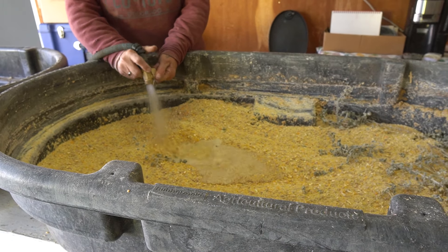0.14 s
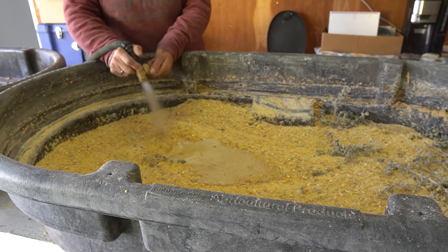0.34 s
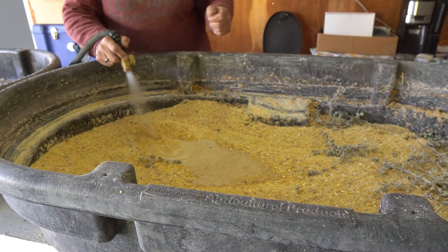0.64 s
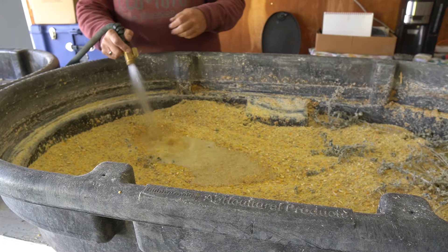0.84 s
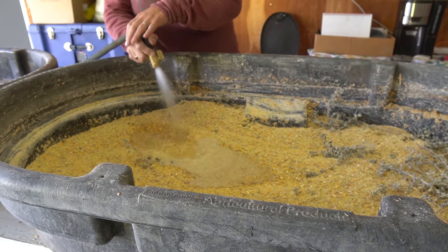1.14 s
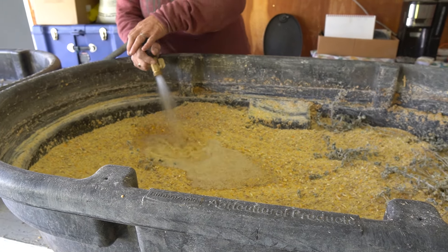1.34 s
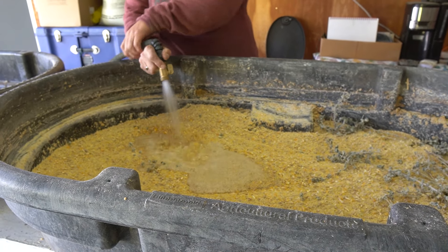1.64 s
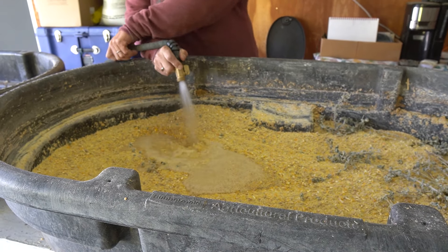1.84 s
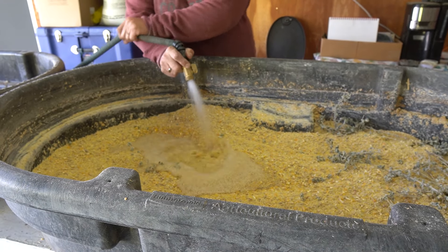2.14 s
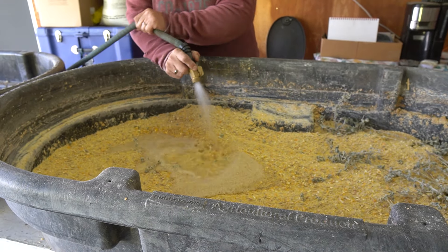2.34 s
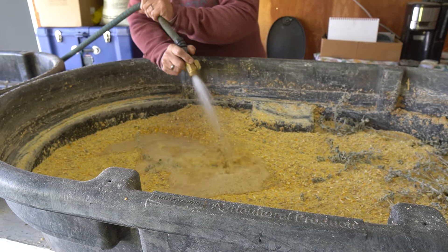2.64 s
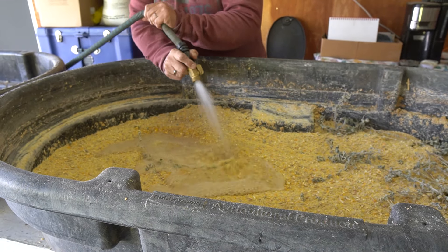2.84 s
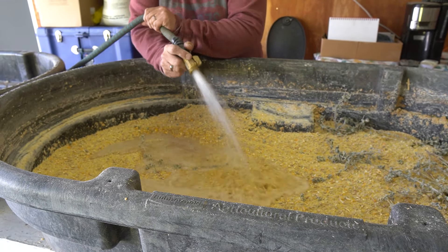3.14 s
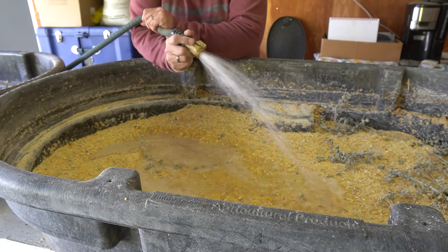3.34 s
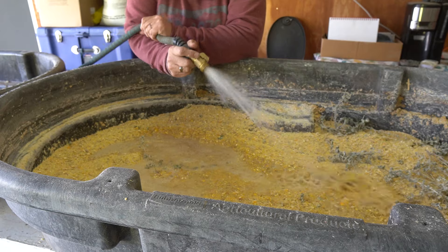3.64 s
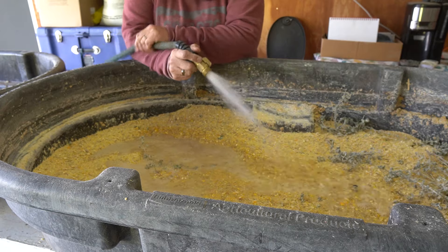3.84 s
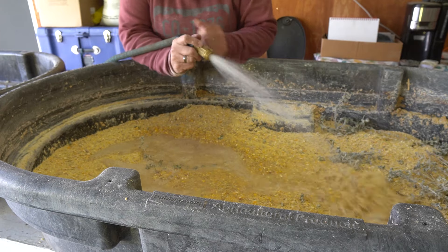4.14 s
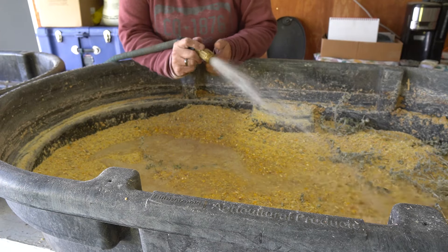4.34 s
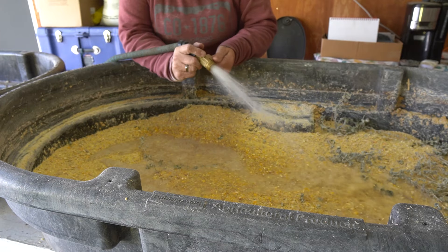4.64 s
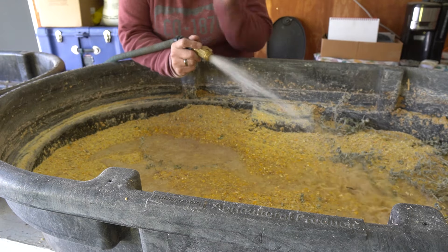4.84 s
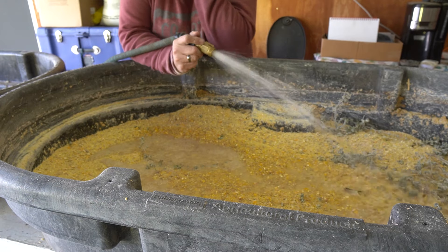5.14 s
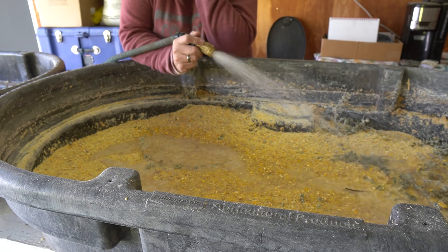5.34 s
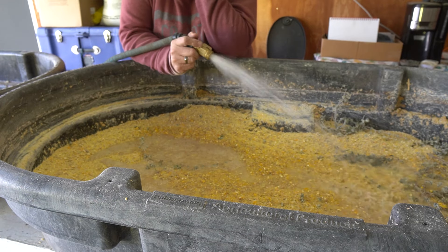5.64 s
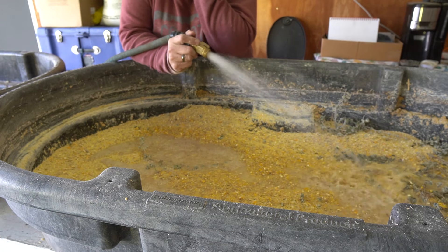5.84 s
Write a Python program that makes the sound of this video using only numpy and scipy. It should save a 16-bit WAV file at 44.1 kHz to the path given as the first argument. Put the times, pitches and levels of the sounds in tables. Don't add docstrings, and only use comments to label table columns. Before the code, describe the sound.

A hose nozzle sprays water steadily onto wet grain and puddles in a plastic tub, very close. A bright, grainy hiss spits violently just before one second, calms, gushes briefly around two and a half, then spits again after four. Dull tank drumming lies beneath. The right side is nearer and sharper; the left is quieter and duller.

```python
import sys
import numpy as np
from scipy import signal
from scipy.fft import rfft, irfft, next_fast_len
from scipy.io import wavfile
from scipy.ndimage import uniform_filter1d

SR = 44100
rng = np.random.default_rng(int(sys.argv[2]) if len(sys.argv) > 2 else 0)


def attenuation_scalar(level_db):
    decades = np.asarray(level_db, float) / 20
    return 10 ** decades


def int16_out(signal):
    q = np.round(np.clip(np.atleast_2d(signal).T, -1, 1) * 32767)
    wavfile.write(sys.argv[1], SR, q.astype(np.int16))


N = 263277

# time in seconds, force in dB, fine mist in dB against it, puddle splash in dB against it.
JET = [(0.0, -41, -9.5, -11.5), (0.32, -44.5, -6, -9.5), (0.66, -39, -7, -15), (0.83, -29, -13.5, -9.5),
       (1.05, -39.5, -7, -11), (1.13, -42, -4.5, -9), (1.68, -43, -8, -9), (1.76, -47, -3.5, -5),
       (2.43, -45.5, -2, -9.5), (2.58, -41, -7.5, -12.5), (2.96, -44.5, -3, -5), (3.44, -41, -3, -15.5),
       (4.22, -40.5, -3, -12.5), (4.64, -33.5, -7.5, -9.5), (4.74, -37.5, -4, -12.5), (5.12, -42, -9, -7),
       (5.94, -41.5, -9, -11.5), (5.97, -40, -11, -13)]
# time in seconds, left-right of drops in dB, left-right of mist in dB.
AIM = [(0.0, -12, -7.0), (0.23, -6, -6), (1.01, -14, -9.5), (1.11, -3.5, -4), (1.3, -2, -7),
       (1.83, 1.5, 5.5), (2.18, -3.5, 0), (2.98, -5.5, -3.0), (3.52, -12, -11.0), (4.16, -10.5, -9.5),
       (4.42, -14.0, -11.0), (4.85, -11.0, -10.5), (5.07, -13.5, 3), (5.97, -10.5, 1.5)]
# time in seconds, delay in ms.
TANK_LAG = [(0, 2.65), (.7, 2.58), (2.5, 2.2), (2.8, 1.4), (3.4, 0.97), (4.1, 0.99), (4.6, 0.52),
            (5.97, 0.16)]
# time in seconds, port resonance in Hz, its lift in dB,
# surface echo dip in Hz, its depth in dB.
ANGLE = [(0, 4520, 5, 2100, -3), (.6, 4540, 8, 2630, 8), (1.2, 4540, 0.5, 2670, 3),
         (1.7, 4350, 8, 2370, 5.5), (2.2, 4400, 3, 2460, 5), (2.6, 4200, 5.5, 2020, 4.5),
         (3.1, 4280, 6.5, 1940, 9.5), (3.5, 4470, 10.5, 2050, 3), (4.1, 4280, 7.5, 2130, 3),
         (4.6, 4340, 6, 2260, -1), (5.2, 4160, 5, 2240, 15.5), (5.97, 3850, 3, 2180, 8.5)]
# time in seconds, share from 0 to 1.
POOL = [(0, 0.45), (1.3, 0.35), (1.55, 1), (2.0, 0.4), (2.6, 1), (2.75, .3), (3.6, 0.45), (4.2, 0.16),
        (5.97, 0.4)]
# peak in seconds, lift in dB, rise in seconds, fall in seconds.
GUSHES = [(0.0, 1, .01, .01), (0.765, 2, 0.005, 0.027), (0.83, 3.5, 0.034, 0.015), (0.992, 6, .012, 0.0064),
          (1.035, 5.5, 0.011, 0.024), (1.16, -0.5, 0.017, 0.071), (1.43, 5.5, 0.01, .05),
          (1.61, 0, .02, .02), (2.06, 1, 0.044, 0.018), (2.31, 1, 0.049, 0.11), (2.59, 8, 0.048, 0.037),
          (2.68, 9.5, 0.0086, 0.0038), (2.93, 0, 0.02, 0.045), (4.27, 2, 0.026, 0.059),
          (4.17, -4, .04, 0.015), (1.012, -6, .006, .008), (1.29, 3.5, 0.014, .02),
          (4.615, 2.5, 0.025, 0.033), (5.9, 0, 0.064, 0.036)]
# peak in seconds, lift in dB, rise in seconds, fall in seconds.
SWINGS = [
    (1.9, -3, .08, 0.044),
    (2.23, 2, 0.07, .08),
    (2.42, -1.5, .05, 0.056),
    (3.2, 2, .08, 0.13),
    (3.52, -2, 0.059, 0.093),
    (4.5, 1.5, .03, .05),
]
# time in seconds, peak at the near microphone in dB, ring in Hz.
SLUGS = [(0.6955, -14, 4370), (0.76, -19, 4340), (0.7656, -16, 4350), (0.7854, -10, 4350),
         (0.796, -22, 4400), (0.804, -5, 4500), (0.8123, -6, 4280), (0.8194, -4, 4770), (0.8555, -9, 4600),
         (0.865, -9, 5140), (0.886, -11, 4700), (0.8959, -17, 4850), (0.9366, -10, 4400),
         (0.9434, -10, 4570), (0.9834, -12, 5700), (0.9895, -11, 4430), (0.993, -9, 4630),
         (0.9977, -13, 5600), (1.0255, -12.5, 4600), (2.5585, -15.5, 4200), (4.3596, -10, 4300),
         (4.4229, -10.5, 4170), (4.503, -8.5, 4100), (4.5279, -14, 4570), (4.5949, -10, 4500),
         (4.614, -9, 4460), (4.6382, -13, 4060), (4.682, -15, 4240), (4.7493, -15, 3900),
         (4.8936, -16, 4160)]
# time in seconds, peak in dB, pitch in Hz, ring t60 in seconds, left-right in dB.
PLOPS = [
    (1.256, -50, 307, 0.065, -22),
    (1.294, -47.5, 276, 0.058, -18),
    (3.913, -29.5, 404, 0.025, -20),
    (3.923, -31.5, 325, 0.026, 6),
    (5.792, -47.5, 602, 0.058, -22),
    (5.938, -37.5, 178, 0.031, -13),
]
# delay in ms, level in dB.
FAR_PATHS = [(2.35, 1), (3.15, -3), (4.0, -25)]
# frequency in Hz, gain in dB per Hz.
NEAR_COLOUR = [(30, -29), (55, -21.5), (110, -8), (240, -6.5), (600, -8.5), (940, -16.5), (1450, -6),
               (2100, -9.5), (3000, -3.5), (4400, 0), (5500, -2.5), (8200, -11), (11500, -16.5),
               (15300, -27)]
FAR_COLOUR = [(30, -37), (100, -7), (340, 6), (640, -6.5), (950, -13), (1220, -6), (2050, -0.5),
              (3300, 8.5), (4550, 14), (5600, 8), (7000, 1.5), (8200, -4.5), (11500, -10.5), (15300, -24)]
BAND_EDGES_HZ = [220, 900, 1800, 2600, 5600]
# level in dB, then dB per dB of force, then dB per dB of gush.
LAYER_DB = [-64.5, -56, -47, -47, -42.5, -42.5]
FORCE_SHARE = [0.045, 0.15, 0.62, 0.61, 0.87, 1.13]
GUSH_SHARE = [0.092, 0.12, 0.55, 0.8, 0.45, 0.37]

CALM_FORCE_DB = -42


def evened(x):
    return x / np.sqrt(np.mean(x ** 2, -1, keepdims=True) + 1e-20)


def curves(rows):
    s, *columns = np.transpose(rows)
    return np.array([np.interp(np.arange(N) / SR, s, c) for c in columns])


def wander(top_hz, low_hz, count):
    hop = 32
    count_slow = N // hop + 2
    hz = np.fft.rfftfreq(count_slow, hop / SR)
    rise = (hz / low_hz) ** 2 / (1 + (hz / low_hz) ** 2)
    fall = 1 + (hz / top_hz) ** 2
    slow = irfft(rfft(rng.standard_normal((count, count_slow))) * rise / fall, count_slow)
    return np.array([np.interp(np.arange(N) / hop, np.arange(len(v)), v) for v in evened(slow)])


def cut(x, hz, kind):
    return signal.sosfilt(signal.butter(2, hz, kind, fs=SR, output="sos"), x)


def coloured(x, colour):
    hz = np.fft.rfftfreq(4096, 1 / SR)
    colour_hz, colour_db = np.transpose(colour)
    db = uniform_filter1d(np.interp(np.log(hz + 1), np.log(colour_hz + 1), colour_db), 5)
    log_gain = np.log(attenuation_scalar(np.maximum(db, -90)))
    circle = np.concatenate([log_gain, log_gain[-2:0:-1]])
    response = np.fft.ifft(np.exp(np.conj(signal.hilbert(circle)))).real[:2048]
    return signal.oaconvolve(x, response)[:N]


def bands(x):
    size = next_fast_len(N + 4096)
    octave = np.log2(np.fft.rfftfreq(size, 1 / SR) + 1)
    above = [np.clip((octave - np.log2(edge)) / .55 + .5, 0, 1) for edge in BAND_EDGES_HZ]
    shares = -np.diff([1 + 0 * octave] + above + [0 * octave], axis=0)
    return irfft(rfft(x, size) * shares, size)[:, :N]


def to_far(x):
    return sum(attenuation_scalar(db) * np.roll(x, round(ms * SR / 1000)) for ms, db in FAR_PATHS)


def walls(x, t60_s, start_ms):
    t, out = np.arange(5000) / SR, 0
    for k in range(3):
        sparse = rng.choice([-1., 1.], len(t)) * (rng.random(len(t)) < .1)
        tail = sparse * attenuation_scalar(-60 * t / t60_s) * (t > start_ms / 1000)
        turn = np.sqrt(2 / 3) * np.cos(2 * np.pi * (k / 3 + 7 * np.arange(N) / SR))
        out = out + signal.oaconvolve(x * turn, tail / np.linalg.norm(tail))[:N]
    return out


def gushes(rows):
    t = np.arange(N) / SR
    return sum(db * np.exp(-((t - s) / np.where(t < s, rise, fall)) ** 2) for s, db, rise, fall in rows)


def layers():
    force_db, mist_db, puddle_db = curves(JET)
    drop_pan_db, mist_pan_db = curves(AIM)
    over_db = force_db - CALM_FORCE_DB
    reach_ms = curves(TANK_LAG)[0] - 1
    own_db = np.array([-0.65 * reach_ms, -0.42 * reach_ms, puddle_db, puddle_db, 0 * over_db,
                       mist_db + gushes(SWINGS)])
    level_db = np.c_[LAYER_DB] + np.c_[FORCE_SHARE] * over_db + np.c_[GUSH_SHARE] * gushes(GUSHES) + own_db
    tank_pan_db = -6.5 + 0.16 * drop_pan_db
    splash_pan_db = -6 + 0.16 * drop_pan_db
    pan_db = np.array([tank_pan_db + 3.8, tank_pan_db, splash_pan_db, splash_pan_db, drop_pan_db, mist_pan_db])
    spit = 0.22 + 0.05 * over_db + 0.078 * wander(top_hz=4.2, low_hz=0.77, count=1)[0]
    return level_db, pan_db, np.clip(spit, 0, 1)


def drops(spit):
    drops_per_s, pitches_hz = 3000, np.geomspace(900, 13000, 12)
    size = attenuation_scalar(4.0 * np.minimum(rng.exponential(1, N), 3)) * rng.choice([-1, 1], N)
    size *= rng.random(N) < drops_per_s / SR
    kind, t, ticks = rng.integers(0, 12, N), np.arange(200) / SR, 0
    for k, hz in enumerate(pitches_hz):
        pop = np.sin(2 * np.pi * hz * t) * np.exp(-t * hz / 1.27)
        ticks = ticks + hz * attenuation_scalar(-hz / 1500) * signal.oaconvolve(size * (kind == k), pop)[:N]
    gust = attenuation_scalar(wander(top_hz=31.4, low_hz=23.9, count=1)[0])
    mist = rng.standard_normal(N)
    return evened(gust * (np.sqrt(1 - spit) * mist + np.sqrt(spit) * evened(ticks)))


def patchy(x, depth_db):
    hz, t, z = signal.stft(x, SR, nperseg=512)
    hz = hz[:, None]

    def mode(centre_hz, width_hz):
        return 1 / (1 + ((hz - centre_hz) / width_hz) ** 2)

    patches = uniform_filter1d(uniform_filter1d(rng.standard_normal(z.shape), 6, 1), 22, 2)
    field_db = depth_db * patches / patches.std()
    s, *columns = np.transpose(ANGLE)
    port_hz, port_db, dip_hz, dip_db = (np.interp(t, s, c) for c in columns)
    field_db[1] += port_db * mode(port_hz, 330)
    field_db[1] -= dip_db * mode(dip_hz, 220)
    field_db[0] += 3.4 * mode(4550, 350)
    reach_ms = np.interp(t, *np.transpose(TANK_LAG)) - 1
    field_db += 1.54 * reach_ms * mode(385, 70)
    field_db += 17.0 * np.interp(t, *np.transpose(POOL)) * mode(1050, 90)
    air_octaves = np.log2(np.maximum(hz, 7000) / 7000)
    s, _, mist_db, _ = np.transpose(JET)
    field_db += 0.37 * (np.interp(t, s, mist_db) + 12) * air_octaves
    field_db += .45 * np.interp(t * SR, np.arange(N), gushes(SWINGS)) * air_octaves
    return signal.istft(z * attenuation_scalar(field_db), nperseg=512)[1][:, :N]


def drummed(near, far):
    late = np.arange(N) - curves(TANK_LAG)[0] * SR / 1000
    alike = np.array([[.6], [.5]])
    shared = alike * [np.interp(late, np.arange(N), v) for v in near[:2]]
    far[:2] = shared + np.sqrt(1 - alike ** 2) * far[:2]
    return far


def spray():
    level_db, pan_db, spit = layers()
    rain, other = drops(spit), drops(.5 * spit)
    near = rain + attenuation_scalar(-7.5) * walls(rain, t60_s=0.1, start_ms=1.0)
    shared = evened(to_far(rain)) + attenuation_scalar(-1) * walls(rain, t60_s=.08, start_ms=3.5)
    far = cut(shared, 6000, "low") + other + cut(other, 6000, "high")
    thrum = cut(rng.standard_normal((2, N)), 630, "low")
    both = cut(np.array([far, near]), 435, "high") + 1.01 * thrum
    far, near = patchy(both, depth_db=0.39)
    near = evened(bands(coloured(near, NEAR_COLOUR)))
    far = drummed(near, evened(bands(coloured(far, FAR_COLOUR))))
    pan = attenuation_scalar(pan_db)
    near_gain = 2 * attenuation_scalar(level_db) / np.sqrt(1 + pan ** 2)
    flicker = wander(top_hz=25.5, low_hz=31, count=12).reshape(2, -1, N)
    lumps = wander(top_hz=7.5, low_hz=1.5, count=6)
    swing_db = np.c_[[.5, .8, 1.2, 1.2, .8, .7]] * flicker + np.c_[[1.8, .8, .6, .8, .45, .6]] * lumps
    return (attenuation_scalar(swing_db) * near_gain * np.array([pan * far, near])).sum(1)


def small_slugs():
    draw = rng.random((600, 4))
    s = draw[:, 0] * N / SR
    over_db = np.interp(s, *np.transpose(JET)[:2]) - CALM_FORCE_DB
    slugs_per_s = np.minimum(14 * 2 ** (over_db / 4), 28)
    keep = draw[:, 1] * 600 * SR / N < slugs_per_s
    db = -22.5 + 0.34 * over_db - 3 * (2 * draw[:, 2] - 1)
    hz = np.interp(s, *np.transpose(ANGLE)[:2]) * (1 + 0.27 * (2 * draw[:, 3] - 1))
    return list(np.transpose([s, db, hz])[keep])


def slugs():
    smacks, t = np.zeros(N + 400), np.arange(400) / SR
    for s, db, hz in list(SLUGS) + small_slugs():
        ring = np.sin(2 * np.pi * hz * t) * attenuation_scalar(-60 * t / 0.007) * (1 - np.exp(-t / .0001))
        slap = 0.42 * np.sin(2 * np.pi * 0.58 * hz * t) * attenuation_scalar(-60 * t / 0.0017)
        smacks[round(s * SR):][:len(t)] += attenuation_scalar(db - 1) * (ring + slap)
    smacks = cut(smacks[:N], 500, "high")
    near = smacks + attenuation_scalar(-6.0) * walls(smacks, t60_s=0.039, start_ms=.8)
    far = attenuation_scalar(-6) * to_far(smacks) + attenuation_scalar(-1) * walls(smacks, t60_s=.04, start_ms=3.0)
    return np.array([attenuation_scalar(curves(AIM)[0]) * far, near])


def plops():
    out, t = np.zeros((2, N + 4000)), np.arange(4000) / SR
    for s, db, hz, t60_s, pan_db in PLOPS:
        tone = np.sin(2 * np.pi * hz * (t + 3.2 * t ** 2))
        ring = tone * attenuation_scalar(db - 60 * t / t60_s) * (1 - np.exp(-t / 0.0077))
        out[:, round(s * SR):][:, :len(t)] += 2 * attenuation_scalar([[pan_db / 2], [-pan_db / 2]]) * ring
    return out[:, :N]


def scene():
    return spray() + slugs() + plops()


def top_cut(x):
    return signal.sosfilt(signal.butter(12, 15950, fs=SR, output="sos"), x)


def record(dry):
    band = cut(dry, 40, "high")
    low_pass = signal.firwin(301, 15750, window=("kaiser", 7), fs=SR)
    mix = signal.oaconvolve(band, low_pass[None], "same")
    return top_cut(mix)


dry = scene()
out = record(dry)
int16_out(out)
```